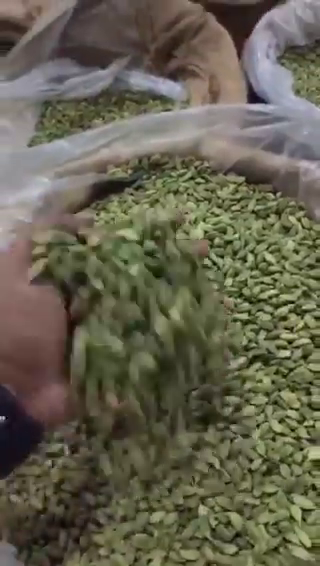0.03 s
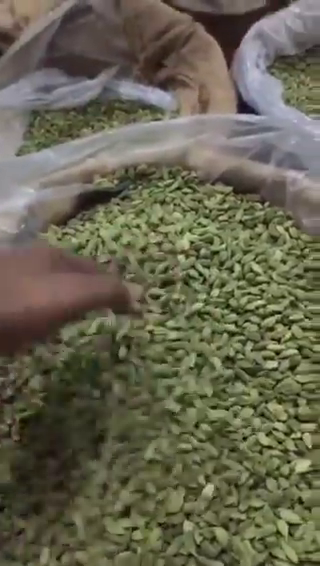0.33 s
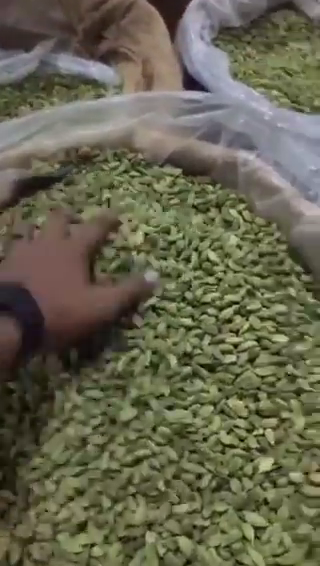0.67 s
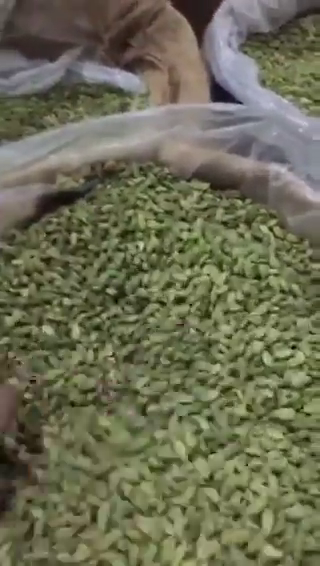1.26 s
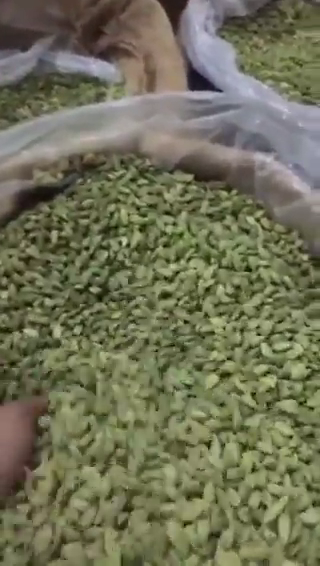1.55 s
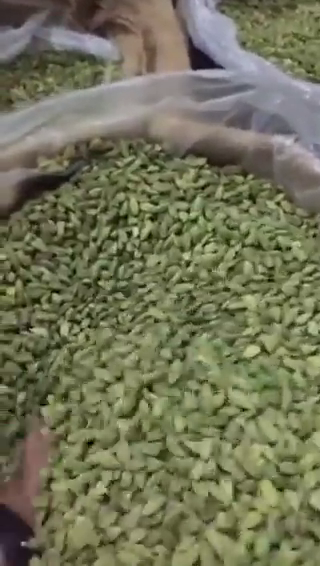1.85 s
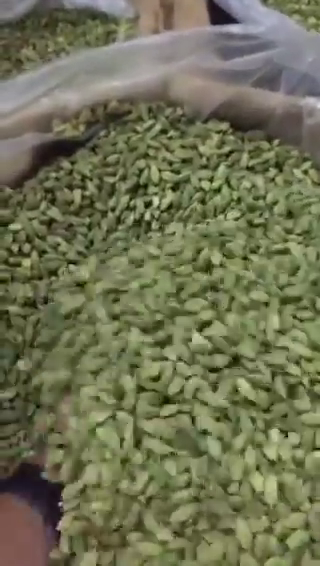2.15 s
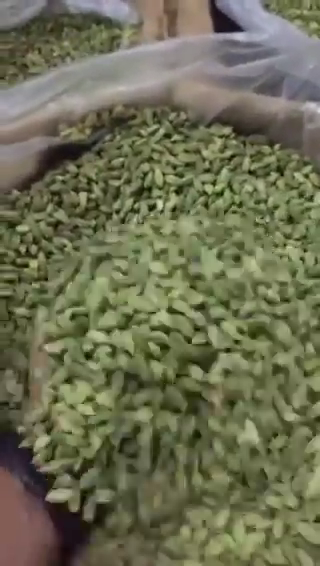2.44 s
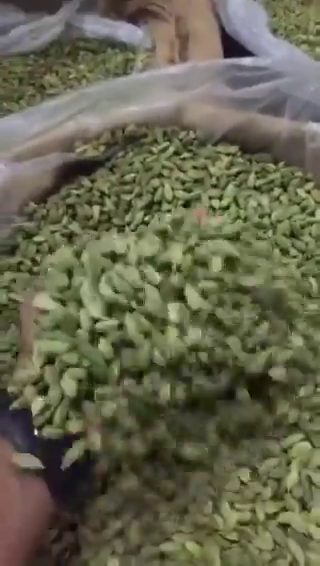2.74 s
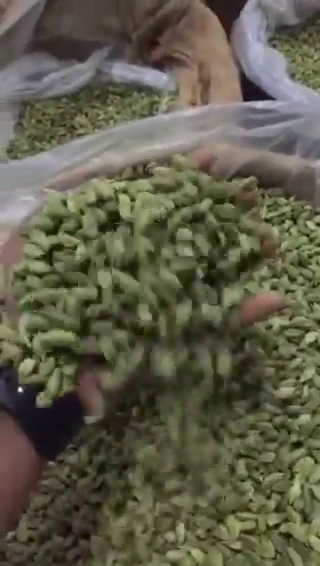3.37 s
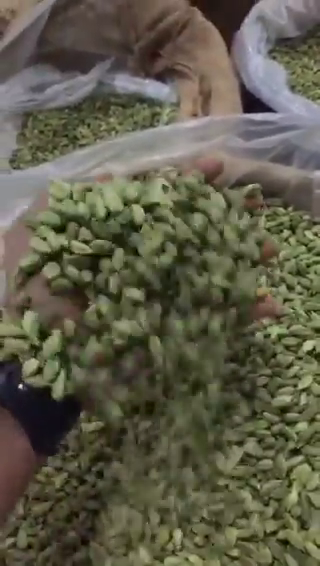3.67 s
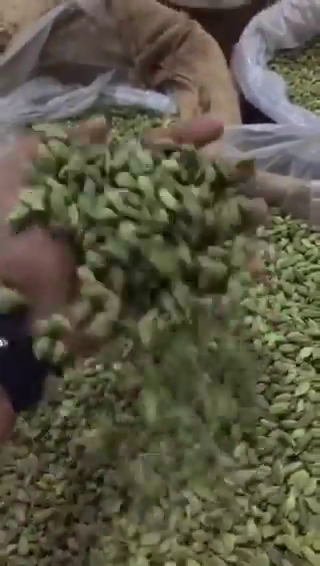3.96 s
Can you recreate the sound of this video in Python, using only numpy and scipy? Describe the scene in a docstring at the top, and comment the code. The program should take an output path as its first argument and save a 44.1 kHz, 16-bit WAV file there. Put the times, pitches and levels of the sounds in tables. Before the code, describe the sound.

Dry cardamom pods rustle and trickle through a hand over a faint engine thud.

```python
"""A dry, close rustle: a handful of cardamom pods drops into a full sack. The hand rakes through them,
digs in, lifts a heap and lets it trickle back. Thousands of tiny husk contacts make the sound, duller
where pods rub in the bed, brighter and grainier where they fall. Behind it a slow machine, probably
a one-cylinder engine, thuds five times a second between the walls of a humming hall."""
import sys
import numpy as np
from scipy import signal
from scipy.io import wavfile

SR = 44100
rng = np.random.default_rng(int(sys.argv[2]) if len(sys.argv) > 2 else 0)


def dump_mix(stems):
    """Bounce the given channels to the path in sys.argv[1] as a 16-bit WAV at rate SR."""
    frames = np.atleast_2d(stems).T  # one column per channel
    limited = np.clip(frames, -1, 1)  # hard clip at full scale
    pcm = np.round(limited * 32767).astype(np.int16)
    wavfile.write(sys.argv[1], SR, pcm)


N = 176400
T = np.arange(N) / SR

# Hall resonances that the machine keeps humming. Each row: centre in Hz, width in Hz, level in dB.
HALL_MODES = [(47.5, 6.5, -72), (106.2, 26, -52), (143.3, 18.6, -47.5), (177.3, 28.5, -53.5),
              (267, 33, -60), (322, 36, -55.5), (387.8, 14.7, -61), (477, 24.5, -66.5), (543, 16.4, -66),
              (982, 40, -68), (1063, 29, -71.5), (2162, 40, -69.5)]
# The engine's beat. Each row: start in seconds, relative strength in dB.
FIRINGS = [(-.035, 0), (.1653, 1.2), (.3662, -.6), (.5641, 2.6), (.7658, 1), (.9644, -.5), (1.1675, .8),
           (1.3668, 0), (1.5676, -.3), (1.7682, -.8), (1.9671, 1.6), (2.1683, 1.8), (2.3672, -1.4),
           (2.5697, 0), (2.7692, -.7), (2.9709, .7), (3.1706, -1.4), (3.3695, 0), (3.5709, 1.5),
           (3.7699, -1.3), (3.971, -.5)]
# Slaps off the walls. Each row: delay in seconds, level against the direct thud in dB.
WALL_ECHOES = [(.0181, -14), (.0461, -11), (.0696, -5), (.0901, -8), (.1104, -8.5), (.1193, -6.5),
               (.1605, -8)]

# Fader moves. Each row: time in seconds, level in dB.
RUSH_FADER = [(0, -68), (2.9, -78), (3.32, -52.5), (3.39, -46.5), (3.45, -51.5), (3.54, -51.5),
              (3.6, -51.5), (3.68, -54), (4, -87)]  # a soft rush while the heap is held up
RAKE_FADER = [(0, -49), (.12, -59), (.17, -46), (.22, -60), (.33, -50.5), (.42, -53.5), (.46, -48.5),
              (.51, -63), (.56, -49.5), (.605, -58), (.635, -44.5), (.705, -49.5), (.735, -41.5),
              (.81, -40), (.87, -43), (.97, -41), (1.03, -43), (1.11, -51.5), (1.17, -46.5), (1.215, -49),
              (1.27, -41.5), (1.305, -47), (1.335, -41), (1.40, -39), (1.50, -47.5), (1.58, -41.5),
              (1.72, -52), (1.77, -47.5), (1.83, -52), (1.91, -52), (1.96, -44.5), (2.3, -51), (2.36, -46),
              (2.6, -46.5), (3.0, -52.5), (4, -49.5)]  # the hand rakes, digs and lifts
POUR_FADER = [(0, -57), (.04, -51.5), (.125, -47.5), (.165, -41), (.27, -36), (.32, -41.5), (.355, -44.5),
              (.41, -53.5), (.46, -64.5), (.52, -56), (1.9, -64), (2.1, -53.5), (2.3, -50), (2.45, -49.5),
              (2.85, -46.5), (3.0, -45), (3.2, -47.5), (3.36, -46.5), (3.55, -46.5), (3.68, -47),
              (4, -45.5)]  # a whole handful falls, later a trickle
# Clumps slide off the heap and swell the trickle. Each row: centre in seconds, boost in dB.
SPILLS = [(2.77, 5), (3.0, 3), (3.14, 2), (3.31, 6), (3.48, 3), (3.57, 4), (3.64, 3), (3.73, 2.5),
          (3.809, 3.5), (3.9, 3)]
# Single pods that land hard. Each row: start in seconds, relative peak in dB.
HARD_LANDINGS = [(.1531, -30), (.3391, -25), (2.8155, -30), (3.0839, -28), (3.2161, -32), (3.2615, -29),
                 (3.2899, -28), (3.4805, -28), (3.6386, -31), (3.7214, -28)]

# EQ curves for the noise layers. Each row: frequency in Hz, relative spectral density in dB.
ROOM_TONE_EQ = [(25, -16), (60, -9), (100, -7.5), (180, -5), (250, -2), (420, -4.5), (700, -13),
                (1300, -14.5), (2500, -15), (5000, -16.5), (11000, -23.5)]  # steady, weighted to the lows
CLATTER_EQ = [(400, 0), (520, 9), (750, -11), (1000, -9), (1400, -3), (2200, -2.5), (3500, -3), (6000, -9)]  # midrange machine rattle
KNOCK_EQ = [(230, 9.5), (330, 9.5), (540, 5), (750, -9.5), (1000, 5.5), (1500, -31)]  # the dull knock on each beat
RUSH_EQ = [(300, 3), (550, -8.5), (750, -14.5), (1000, -0.5), (1400, -15.5), (2500, -17)]  # low, with a narrow midrange peak
RUB_EQ = [(700, -16), (1200, -22), (1700, -6.5), (2800, -4), (4000, -4), (5300, 0.5), (7000, -1),
          (9000, -2.5), (11500, -5)]  # husks rubbing in the bed
FALL_EQ = [(700, -11), (1500, -10), (2800, -5), (4000, 0), (5300, 3), (7000, 3.5), (8800, 3), (11200, 3)]  # falling husks, brighter


def from_db(db):
    """Decibels to gain."""
    return 10 ** (np.asarray(db) / 20)


def rms_one(x):
    """Scale to rms 1."""
    return x / np.sqrt(np.mean(x ** 2) + 1e-20)


def fader(rows):
    """Join (seconds, dB) rows with straight ramps."""
    return np.interp(T, *np.transpose(rows))


def swell(centre_s, width_s):
    """A bell-shaped rise and fall."""
    return np.exp(-.5 * ((T - centre_s) / width_s) ** 2)


def white():
    """White noise."""
    return rng.standard_normal(N)


def band(x, low_hz, high_hz):
    """Butterworth band-pass."""
    sos = signal.butter(2, [low_hz, min(high_hz, .45 * SR)], "band", fs=SR, output="sos")
    return signal.sosfilt(sos, x + 1e-18)


def drift(rate_hz):
    """A smooth random wobble with rms near 1."""
    pole = np.exp(-80 * np.pi * rate_hz / SR)
    noise = rng.standard_normal(N // 40 + 2002)  # one value every 40 samples
    slow = signal.lfilter([1], [1, -2 * pole, pole * pole], noise)[2000:]
    return np.interp(np.arange(N) / 40, np.arange(len(slow)), rms_one(slow))


def coloured(eq, excite=white):
    """Third-octave bands, each fed by its own call of excite, mixed along the EQ curve; rms 1."""
    hz, db = np.transpose(eq)
    edges_hz = 12500 / 2 ** (np.arange(28, -1, -1) / 3)
    out = 0
    for low, high in zip(edges_hz, edges_hz[1:]):
        if high > hz[0] and low < hz[-1]:
            band_db = np.interp(np.log(low * high) / 2, np.log(hz), db)
            out = out + from_db(band_db) * band(excite(), low, high)
    return rms_one(out)


def hall(room_tone_db=-50):
    """The hall's resonances hum over a steady room tone."""
    hum = sum(from_db(db) * rms_one(band(white(), hz - width / 2, hz + width / 2))
              for hz, width, db in HALL_MODES)
    return hum + from_db(room_tone_db) * coloured(ROOM_TONE_EQ)


def engine_thuds(level_db=-42.6, band_hz=(110, 184), echo_spread_db=.8):
    """Each firing is one low puff, followed by its slaps off the walls."""
    pulses = np.zeros(N + 2 * SR)  # a spare second at each end
    for start, strength_db in FIRINGS:
        for delay, db in [(0, .005)] + list(WALL_ECHOES):
            scatter_db = echo_spread_db * rng.standard_normal() * (delay > 0)
            pulses[int((1 + start + delay) * SR)] += from_db(strength_db + db + scatter_db)
    puffs = band(band(pulses, *band_hz), *band_hz)
    return from_db(level_db) * rms_one(puffs[SR:SR + N])


def engine_clatter(gain_db=-51.5, lag_s=.0074):
    """Mechanical noise, blurred by distance, swells round each firing."""
    envelope = sum(from_db(db) * swell(start + lag_s, width_s=.021) for start, db in FIRINGS)
    return from_db(gain_db) * envelope * coloured(CLATTER_EQ)


def engine_knock(gain_db=-50.5, t60_s=.39):
    """A dull knock comes with each firing and dies away in the hall."""
    envelope = sum(from_db(db - 60 * np.clip((T - start) / t60_s, 0, 2)) * (T >= start)
                   for start, db in FIRINGS)
    return from_db(gain_db) * envelope * coloured(KNOCK_EQ)


def soft_rush():
    """A soft, low rush comes up while the heap is held."""
    return from_db(fader(RUSH_FADER)) * coloured(RUSH_EQ)


def hard_landings(trim_db=-4, t60_s=.008, band_hz=(4500, 11000)):
    """A pod hits with a sharp click that dies in a few milliseconds."""
    out = np.zeros(N)
    for start, db in HARD_LANDINGS:
        age = np.maximum(T - start, 0)
        envelope = (T >= start) * from_db(-60 * np.minimum(age / t60_s, 10))
        click = band(white() * envelope, *band_hz)
        out += from_db(db + trim_db) * click / np.abs(click).max()
    return out


def husk_rings(flow_db, trim_db=-8, per_s=700, low_hz=4620, high_hz=11490, t60_s=.017, spread_db=3):
    """Hollow husks ring for a moment as they land, each at a pitch of its own."""
    age = np.arange(1024) / SR
    out = np.zeros(N + len(age))
    for onset in np.flatnonzero(rng.random(N) < per_s / SR):
        hz = low_hz * (high_hz / low_hz) ** rng.random()
        size_db = spread_db * min(rng.exponential(), 4)
        envelope = from_db(size_db - 60 * age / t60_s)
        out[onset:onset + len(age)] += envelope * np.sin(2 * np.pi * hz * age)
    return from_db(flow_db + trim_db) * rms_one(out[:N])


def husk_contacts(level_db, eq, base_per_s, spread_db, clump_db, clump_hz, variety_db, t60_s=.004):
    """Husks touch at random, more often when louder; each touch is a tiny dying scratch."""
    level = from_db(level_db)
    per_s = base_per_s * np.maximum(rms_one(level), .5)
    onsets = np.flatnonzero(rng.random(N) < per_s / SR)
    size_db = spread_db * np.minimum(rng.exponential(1, N), 4)
    clumping_db = clump_db * drift(clump_hz)
    sizes = (from_db(size_db + clumping_db) / np.sqrt(per_s))[onsets]  # density alone adds no level
    energy_decay = from_db(-120 / (t60_s * SR))

    def scratches():
        """One band's grains, weighted afresh so that every touch has its own colour."""
        energy = np.zeros(N)
        energy[onsets] = (sizes * from_db(variety_db * white()[onsets])) ** 2
        return white() * np.sqrt(signal.lfilter([1], [1, -energy_decay], energy + 1e-18))
    return level * coloured(eq, scratches)


def raking():
    """Pods rub in the bed under the hand: a dense, even rustle."""
    return husk_contacts(fader(RAKE_FADER), RUB_EQ, base_per_s=6700, spread_db=-.5,
                         clump_db=.5, clump_hz=30, variety_db=1.5)


def pouring(flow_db):
    """Pods fall onto the heap: sparser, brighter grains that come in clumps."""
    return husk_contacts(flow_db, FALL_EQ, base_per_s=2000, spread_db=2.5,
                         clump_db=1.3, clump_hz=35, variety_db=3.2)


def scene():
    """Pods up front, the machine far behind; both channels alike."""
    flow_db = fader(POUR_FADER) + sum(db * swell(centre, width_s=.012) for centre, db in SPILLS)
    background = engine_thuds() + engine_clatter() + engine_knock() + hall() + soft_rush()
    pods = raking() + pouring(flow_db) + hard_landings() + husk_rings(flow_db)
    mono = background + pods
    return np.array([mono, mono])


def record(dry):
    """A steep low-pass takes off the very top."""
    cutoff_hz = 11600
    return signal.sosfilt(signal.ellip(12, .2, 80, cutoff_hz, fs=SR, output="sos"), dry)


dry = scene()
out = record(dry)
dump_mix(out)
```